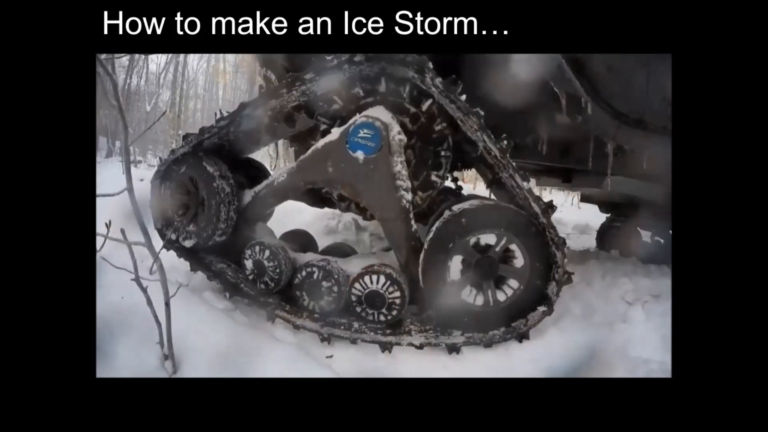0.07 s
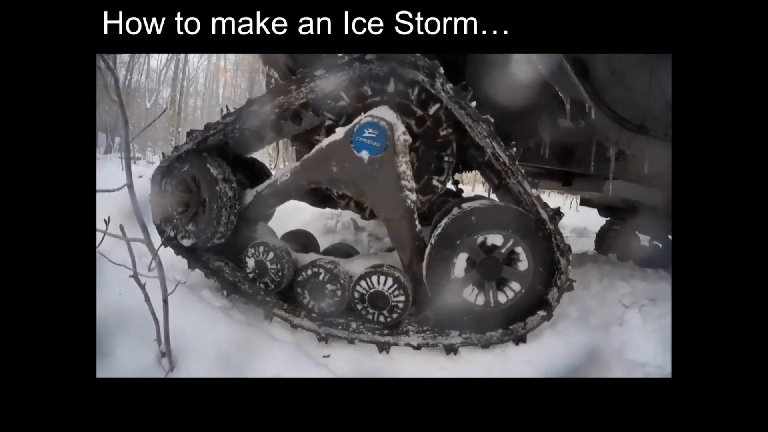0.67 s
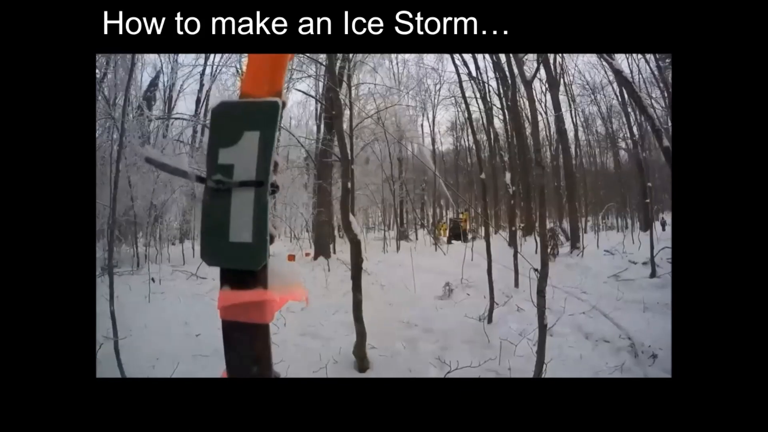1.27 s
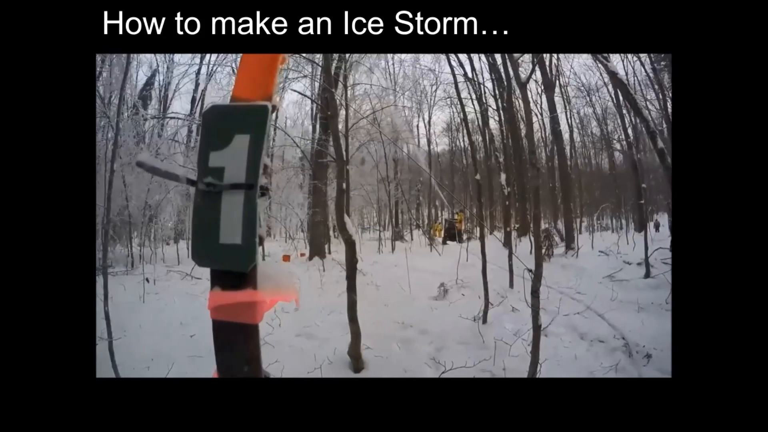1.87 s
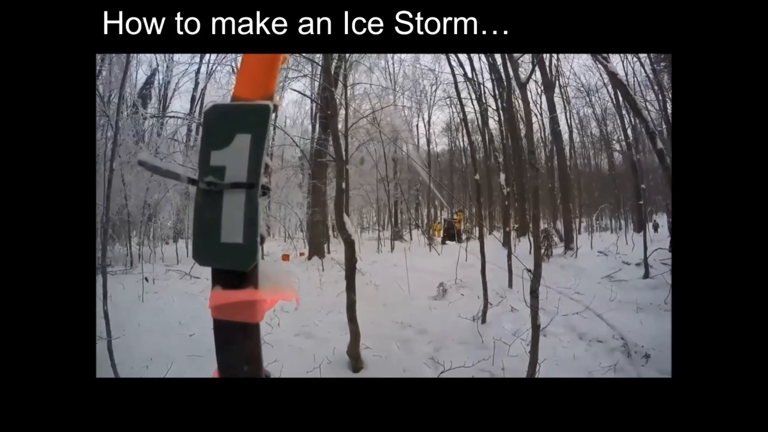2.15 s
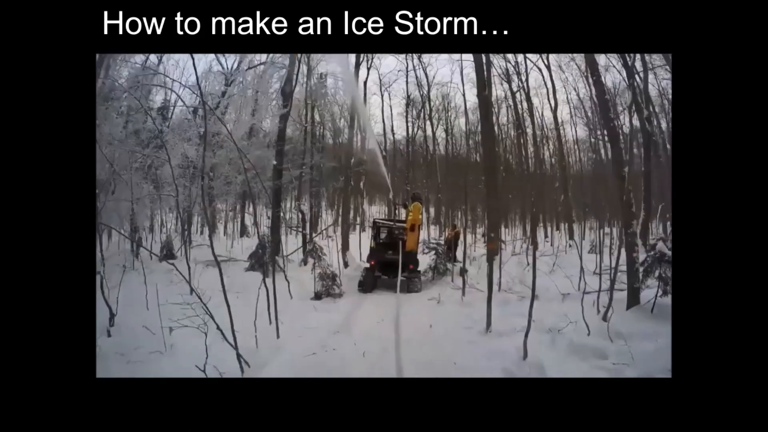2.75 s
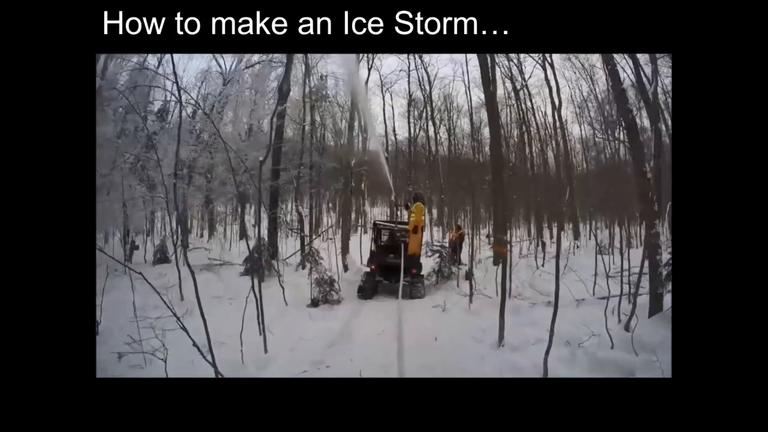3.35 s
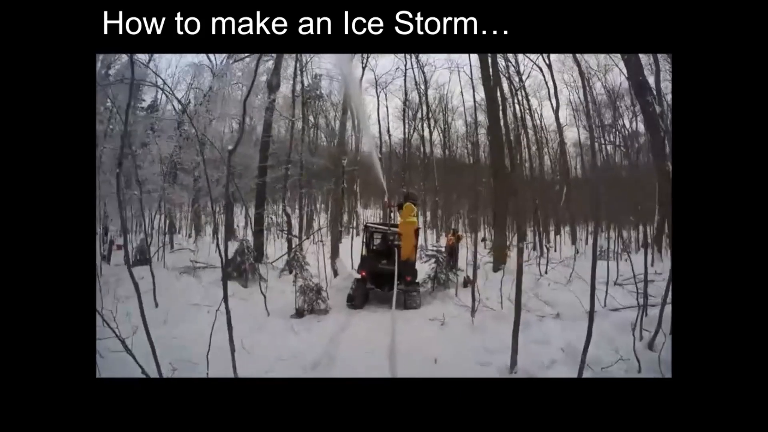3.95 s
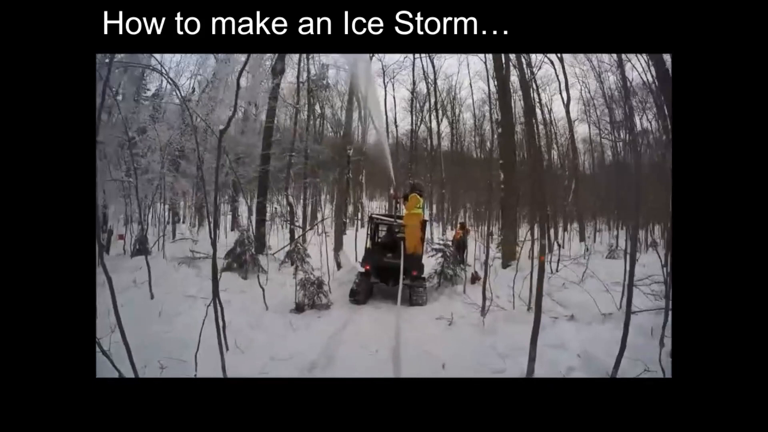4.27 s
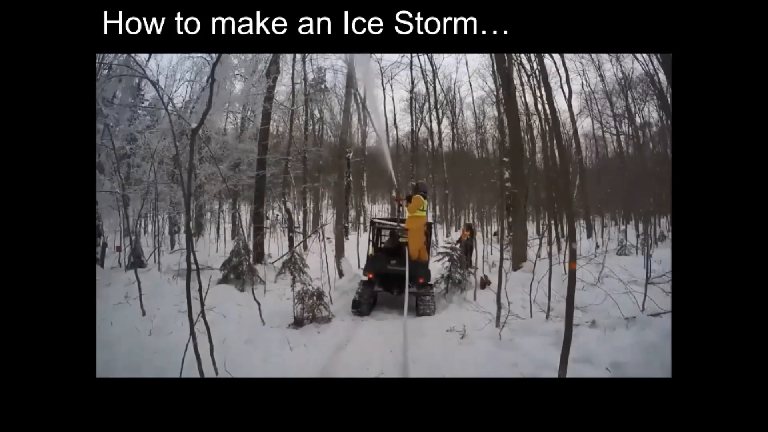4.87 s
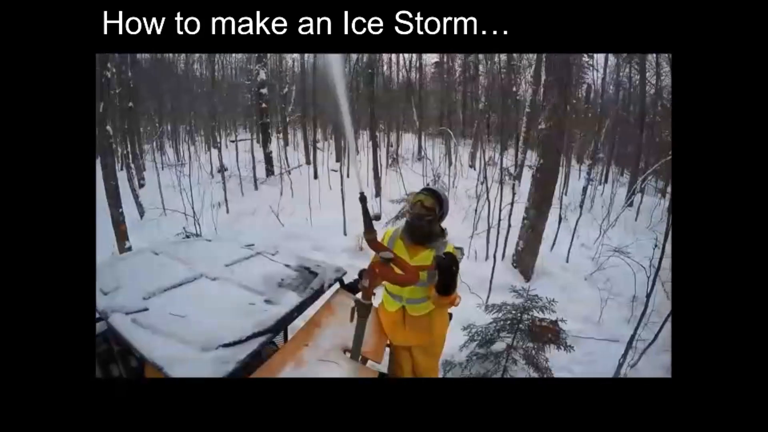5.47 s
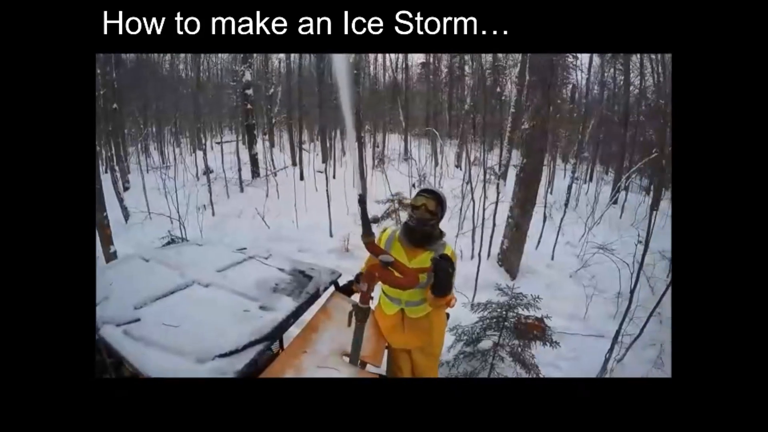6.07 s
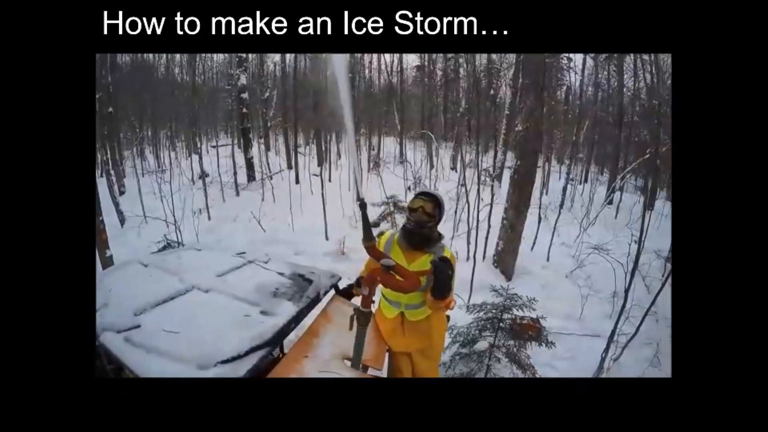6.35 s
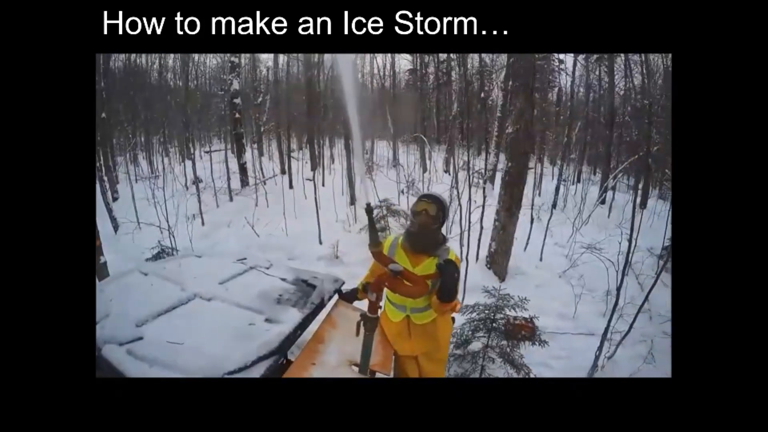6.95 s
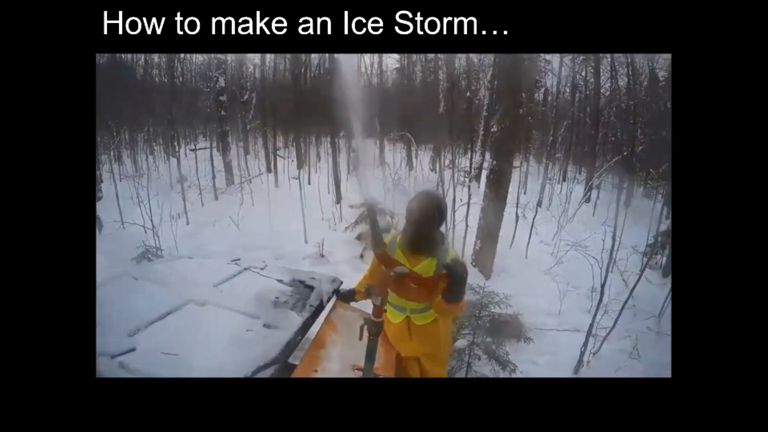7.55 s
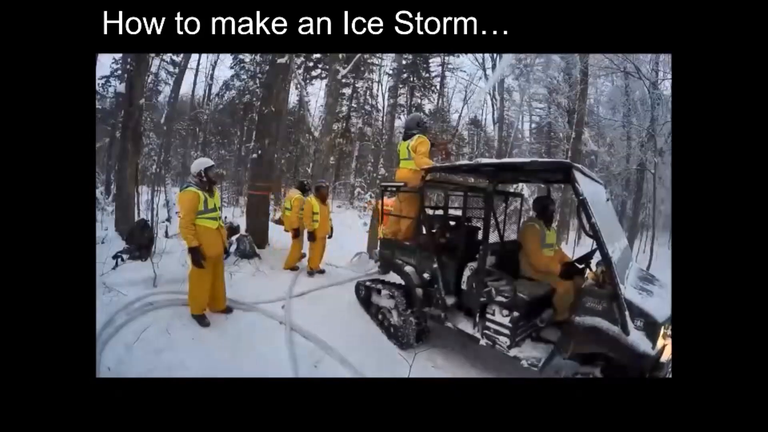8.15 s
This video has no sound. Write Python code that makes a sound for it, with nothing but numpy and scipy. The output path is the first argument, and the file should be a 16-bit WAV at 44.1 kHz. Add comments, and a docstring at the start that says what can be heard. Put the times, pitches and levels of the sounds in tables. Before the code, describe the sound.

Loud rubber track rattle and metal clanks give way to a quieter, steady engine hum and clatter that grows nearer in stages.

```python
"""A tracked utility vehicle in a snowy wood, heard from five places in turn. Close by, its rubber track hammers
the wheel frame and scrapes over snow; the loudest knocks clank. Then its twin-cylinder engine runs steadily:
far off, nearer, on board, beside it. Firings rattle the casing, the exhaust hums, the chassis rumbles, a pump
drones. The engine powers a water spray, which fizzes twice. Soft air buffets come and go. The sound drops out
now and then."""
import sys
import numpy as np
from scipy import signal
from scipy.fft import rfft, irfft, next_fast_len
from scipy.io import wavfile
from scipy.ndimage import uniform_filter1d

SR = 44100
rng = np.random.default_rng(int(sys.argv[2]) if len(sys.argv) > 2 else 0)


def output_pcm(signal):
    """Save a mono or channel-first signal as 16-bit PCM at the path in sys.argv[1].

    Samples are clipped to [-1, 1] before scaling.
    """
    pcm = np.clip(np.atleast_2d(signal).T, -1, 1) * 32767
    wavfile.write(sys.argv[1], SR, np.round(pcm).astype(np.int16))


N = 361972
T = np.arange(N) / SR
FFT_SIZE = next_fast_len(N)
BIN_HZ = np.fft.rfftfreq(FFT_SIZE, 1 / SR)

# Broad spectra. Each row: frequency in Hz, relative density in dB.
FRAME_SPECTRUM = [(25, -31.5), (60, -15), (110, -1), (230, -4.5), (330, 3), (560, -1), (900, 2.5),
                  (1400, -6.5), (2100, -6.5), (2900, -15), (3700, -17.5), (4600, -30), (7000, -32),
                  (12000, -38), (15000, -38.5)]
SCRAPE_SPECTRUM = [(50, -17.5), (120, -4.5), (400, -0.5), (1000, 5), (1500, -6), (2600, -7.5),
                   (4500, -15.5), (7000, -18), (9000, -23.5), (12000, -30.5), (15000, -47)]
CHASSIS_SPECTRUM = [(15, -29), (26, -6), (37, -4), (70, -0.5), (95, -9.5), (150, -12), (220, -17.5),
                    (400, -15.5), (650, -30), (1200, -58)]
FAR_CASING = [(300, -21), (500, -12.5), (750, -15.5), (1300, -7), (1800, -9.5), (2200, -8.5), (2650, 1.5),
              (3450, -2), (4200, -11.5), (5250, -7), (5800, -11.5), (7700, -18), (9000, -28.5),
              (10500, -21), (15000, -32)]
NEAR_CASING = [(290, -32), (500, -12), (714, -13.5), (896, -7.5), (1130, -10), (1240, 0.5), (1560, -9.5),
               (1850, -1), (2170, -6), (2570, 4.5), (3410, 1), (5540, -4), (6800, -9.5), (7300, -15),
               (10800, -22.5), (12500, -19), (14000, -19), (15000, -29)]
ABOARD_CASING = [(290, -35.5), (500, -8), (694, -15), (777, -8), (883, -10.5), (1170, -2.5), (1420, -4),
                 (1720, -12.5), (2330, -5), (2610, 3), (3410, -6), (4290, -6.5), (4870, -1), (8020, -20.5),
                 (11800, -20.5), (15000, -26.5)]
BESIDE_CASING = [(290, -44), (500, -8), (734, -7.5), (1110, -4.5), (1210, -3.5), (1720, -4), (3000, 2),
                 (3460, -6), (3880, 4), (4230, -8), (5230, -2.5), (6670, -8), (7580, -19.5), (12500, -16.5),
                 (15000, -29)]
# Wheel frame resonances. Each row: centre in Hz, width in Hz, height over the broad spectrum in dB.
FRAME_PEAKS = [(305, 30, 3), (390, 30, 5), (465, 40, 6), (630, 25, 3), (762, 35, 7), (1062, 40, 8),
               (1625, 70, 6), (1681, 14, 9), (1822, 45, 12), (1970, 60, 8), (2448, 30, 5), (2615, 45, 8)]
# The pump's low drone. Each row: centre in Hz, width in Hz, height over the rumble in dB.
PUMP_TONES = [(36, 6.5, 6.5), (73, 4.2, 6)]
# Loudest track knocks. Each row: start in seconds, relative level in dB, centre in Hz.
LOUD_KNOCKS = [(0.001, -28, 1280), (0.099, -31.5, 1850), (0.131, -41, 3000), (0.193, -35, 1710),
               (0.257, -42.5, 1850), (0.287, -33.5, 1520), (0.454, -32, 1500), (0.454, -34.5, 3500),
               (0.546, -33.5, 1200), (0.581, -34, 1830), (0.709, -38, 3400), (0.949, -38, 1190),
               (1.036, -41, 1100)]
# Engine speed. Each row: time in seconds, four-stroke cycles per second.
CYCLE_RATE = [(1.2, 26.482), (2.6, 25.849), (3.05, 26.264), (4.2, 26.398), (5.6, 26.042), (6.5, 26.153),
              (7.8, 25.964)]
# Engine fades per place. Each: start, fade-in length, fade-out start, fade-out length, in seconds.
FAR_FADES = (0.79, 0.35, 2.71, 0.62)
NEAR_FADES = (2.61, .45, 5.31, .4)
ABOARD_FADES = (5.162, 0.51, 7.567, 0.47)
BESIDE_FADES = (7.79, 0.025, 8.3, .1)
# Pinging engine parts. Each row: centre in Hz, width in Hz, relative gain in dB.
FAR_PING_MODES = [(1305, 61, 2), (2950, 91, -1), (3560, 70, 9.5), (5220, 120, 5), (6220, 96, -2)]
NEAR_PING_MODES = [(1280, 120, 7), (2900, 160, 8), (3380, 100, 18.5), (3690, 110, 8), (4160, 73, 4),
                   (4670, 200, 17), (5380, 260, 6.9), (7540, 180, 0.33)]
ABOARD_PING_MODES = [(2730, 350, -11), (3900, 29, 3), (4690, 59, 2), (4980, 150, -2)]
BESIDE_PING_MODES = [(3070, 200, -13), (3750, 160, 0), (4520, 200, -5), (5130, 88, -12)]
# Exhaust hum and gear whine. Each row: order as a multiple of the cycle rate, relative level in dB.
FAR_HUM = [(2, 3), (3, -38), (4, -6.5), (5, -33.5), (6, -23), (8, -14.5), (10, -35)]
NEAR_HUM = [(1, -6), (2, 2.5), (3, -33), (4, -.5), (5, -24), (6, -15.5), (8, -13.5), (10, -17), (11, -22),
            (12, -17.5), (14, -26), (16, -18), (18, -21), (19, -25), (20, -22.5)]
ABOARD_HUM = [(1, -12), (2, -3), (3, -11.5), (4, 2.5), (5, -5.5), (6, -6), (7, -6), (8, -22), (9, -13),
              (10, -10.5), (11, -15), (12, -14.5), (13, -9.5), (14, -29), (15, -15.5), (16, -28),
              (17, -15.5), (18, -23), (19, -20), (20, -35), (21, -32), (22, -29), (23, -38), (24, -31),
              (25, -23)]
BESIDE_HUM = [(1, -28), (2, 5), (3, -26.5), (4, -7), (5, -22), (6, -13), (7, -32.5), (8, -0.5), (9, -17),
              (10, -18), (11, -12.5), (12, -13), (13, -16), (14, -17.5)]
ABOARD_WHINE = [(29, -24.5), (44, -19.5)]
BESIDE_WHINE = [(44, -17), (50, -16.5), (147, -32)]
# Brief dropouts. Each entry: start in seconds.
DROPOUT_STARTS_S = [1.776, 1.983, 2.638, 2.788, 3.138, 3.418, 3.698, 3.738, 3.858, 3.998, 4.098, 4.418,
                    4.458, 4.658, 5.698, 5.858, 6.578, 6.978, 7.158, 7.178, 8.138]
# Swells of air and water. Each row: start in seconds, length in seconds, top level in dB.
AIR_BUFFETS = [(2.95, 0.28, -51.5), (3.33, 0.14, -58), (4.38, 0.36, -65), (6.5, 0.22, -53)]
SPRAY_SURGES = [(5.36, .32, -54), (6.1, .2, -51)]


def amp(db):
    """Decibels to gain."""
    return 10 ** (np.asarray(db) / 20)


def unit(x):
    """Scales to rms 1."""
    return x / np.sqrt(np.mean(x ** 2) + 1e-20)


def ramp(start_s, length_s):
    """Linear rise from 0 to 1."""
    return np.clip((T - start_s) / length_s, 0, 1)


def drift(per_s):
    """Random curve, per_s new values a second."""
    return np.interp(T * per_s, np.arange(N // 8), rng.standard_normal(N // 8))


def colour(x, spectrum=((1, 0),), peaks=()):
    """Broad spectrum plus peaks, rms 1; minimum phase, so ringing follows each blow."""
    hz, db = np.transpose(spectrum)
    db = np.interp(np.log(BIN_HZ + 1), np.log(hz), db)
    for centre_hz, width_hz, height_db in peaks:
        db = db + height_db / (1 + (2 * (BIN_HZ - centre_hz) / width_hz) ** 2)
    cepstrum = irfft(np.log(amp(db)), FFT_SIZE)
    cepstrum[1:] *= 2 * (np.arange(1, FFT_SIZE) < FFT_SIZE / 2)
    response = np.exp(rfft(cepstrum))
    return unit(irfft(rfft(x, FFT_SIZE) * response, FFT_SIZE)[:N])


def blows(cycles, rise_cycles, decay_cycles, scatter_db):
    """Envelope of one blow a cycle, each of random strength."""
    age = cycles % 1
    strength = amp(scatter_db * rng.standard_normal(512))[cycles.astype(int) % 512]
    return strength * (1 - np.exp(-(age / rise_cycles) ** 2)) * np.exp(-age / decay_cycles)


def grit(grain_db):
    """Noise of tiny, uneven impacts."""
    return rng.standard_normal(N) * amp(grain_db * drift(1500))


def track(slow_hz=31.2, fast_hz=33.6, speed_up_s=0.76):
    """Rubber track knocks ring the wheel frame, over snow scrape and a thud at twice the knock rate."""
    cycles = np.cumsum(np.where(T < speed_up_s, slow_hz, fast_hz)) / SR
    force = 0.08 + blows(cycles - 0.04, 0.07, 0.29, scatter_db=0.6)
    knocks = amp(-5) * colour(force * grit(-0.5), FRAME_SPECTRUM, FRAME_PEAKS)
    scrape = amp(-8) * colour(grit(1.5), SCRAPE_SPECTRUM, FRAME_PEAKS)
    thud = amp(-27) * unit(np.cos(4 * np.pi * cycles))
    gain = amp(-29.5) * (1 - ramp(start_s=0.65, length_s=0.6))
    return gain * (knocks + scrape + thud)


def clanks(rise_s=0.0044, decay_s=0.013):
    """The loudest track knocks strike the frame: band-limited bursts ring its resonances."""
    strikes, t = np.zeros(N), T[:4096]
    octave = np.log2(np.fft.rfftfreq(len(t), 1 / SR) + 1)
    envelope = 2 * (1 - np.exp(-t / rise_s)) * np.exp(-t / decay_s)
    for start_s, db, hz in LOUD_KNOCKS:
        width_octaves = 0.62 * (1500 / hz) ** 1.26
        band = np.exp(-((octave - np.log2(hz)) / width_octaves) ** 2 / 2)
        burst = unit(irfft(rfft(rng.standard_normal(len(t))) * band))
        strikes[round(start_s * SR):][:len(t)] += amp(db) * burst * envelope
    return np.std(strikes) * colour(strikes, peaks=FRAME_PEAKS)


def fader(fades, db, db_per_s):
    """Gain at one place: fade in, sloping hold, fade out."""
    start_s, fade_in_s, leave_s, fade_out_s = fades
    hold = amp(db + db_per_s * (T - (start_s + leave_s) / 2))
    return ramp(start_s, fade_in_s) * (1 - ramp(leave_s, fade_out_s)) * hold


def engine_tones(cycles, orders, waver_rad, upper_db=0):
    """Wavering engine orders; phase offsets above order 4 spread each pulse over the cycle."""
    tones = np.zeros(N)
    for order, db in orders:
        k = round(order)
        phase = 1.1 * max(k - 4, 0) ** 2 + waver_rad * np.sqrt(k) * drift(9)
        gain = amp(db + (k > 8) * upper_db)
        tones += gain * np.sqrt(2) * np.cos(2 * np.pi * k * cycles + phase)
    return tones


def pings(cycles, modes):
    """The nearer cylinder's firing rings metal parts in narrow resonances."""
    taps = blows(cycles, 0.04, 0.09, scatter_db=1.5) * rng.standard_normal(N)
    return unit(sum(amp(db) * signal.lfilter(*signal.iirpeak(hz, hz / width_hz, fs=SR), taps)
                    for hz, width_hz, db in modes))


def casing(cycles, spectrum, ping_modes, ping_db, farther_gain, steady_gain, gears=()):
    """Two firings and four valve ticks a cycle shake the casing; parts ping, any gears whine."""
    nearer = blows(cycles, 0.05, 0.12, scatter_db=3)
    farther = farther_gain * blows(cycles + 0.5, 0.05, 0.12, scatter_db=3)
    valves = 0.23 * blows(4 * cycles, 0.07, 0.05, scatter_db=1.7)
    clatter = colour((steady_gain + nearer + farther + valves) * grit(1), spectrum)
    ringing = amp(ping_db) * pings(cycles, ping_modes)
    whine = engine_tones(cycles, gears, waver_rad=0.083)
    return clatter + ringing + whine


def exhaust(cycles, orders, lag_cycles, rumble_db, upper_db=0):
    """The pipe hums on the engine orders; the pump drones within the chassis rumble."""
    hum = unit(engine_tones(cycles - lag_cycles, orders, waver_rad=0.34, upper_db=upper_db))
    rumble = colour(rng.standard_normal(N), CHASSIS_SPECTRUM, PUMP_TONES)
    return hum + amp(rumble_db) * rumble


def engine():
    """Twin-cylinder four-stroke: casing and exhaust from four places in turn."""
    cycles = np.cumsum(np.interp(T, *np.transpose(CYCLE_RATE))) / SR
    # The beat shifts at the long dropout and at each new place.
    far = cycles - np.where(T < 1.797, 0.725, 0.975)
    near, aboard, beside = cycles - 0.79, cycles - 0.68, cycles - 0.18
    # At the nearer place the vehicle creeps closer: upper exhaust orders grow.
    start_s, _, leave_s, _ = NEAR_FADES
    creep_db = -3.5 + 2.5 * np.clip(T - start_s, 0, leave_s - start_s)
    return sum([
        fader(FAR_FADES, db=-56, db_per_s=-0.7)
        * casing(far, FAR_CASING, FAR_PING_MODES, ping_db=-9.5, farther_gain=1, steady_gain=0.59),
        fader(FAR_FADES, db=-61, db_per_s=2)
        * exhaust(far, FAR_HUM, lag_cycles=0.032, rumble_db=-6),
        fader(NEAR_FADES, db=-50, db_per_s=1.27)
        * casing(near, NEAR_CASING, NEAR_PING_MODES, ping_db=-11, farther_gain=0.24, steady_gain=0.74),
        fader(NEAR_FADES, db=-51, db_per_s=0.1)
        * exhaust(near, NEAR_HUM, lag_cycles=0.031, rumble_db=-10, upper_db=creep_db),
        fader(ABOARD_FADES, db=-40.5, db_per_s=-0.62)
        * casing(aboard, ABOARD_CASING, ABOARD_PING_MODES, ping_db=-8,
                 farther_gain=0.57, steady_gain=1, gears=ABOARD_WHINE),
        fader(ABOARD_FADES, db=-42, db_per_s=-0.05)
        * exhaust(aboard, ABOARD_HUM, lag_cycles=-0.038, rumble_db=-9),
        fader(BESIDE_FADES, db=-44, db_per_s=0.5)
        * casing(beside, BESIDE_CASING, BESIDE_PING_MODES, ping_db=-8.5,
                 farther_gain=0.72, steady_gain=0.95, gears=BESIDE_WHINE),
        fader(BESIDE_FADES, db=-43, db_per_s=2)
        * exhaust(beside, BESIDE_HUM, lag_cycles=-0.076, rumble_db=-8)])


def swells(rows):
    """One half-sine of gain per event."""
    return sum(amp(db) * np.sin(np.pi * ramp(start_s, length_s)) for start_s, length_s, db in rows)


def wind():
    """Air nudges the microphone in soft, low buffets."""
    spectrum_hz_db = [(10, 0), (25, -3), (70, -3), (160, -33), (500, -34), (2000, -79)]
    return swells(AIR_BUFFETS) * colour(rng.standard_normal(N), spectrum_hz_db)


def spray():
    """The water jet fizzes in the top octave."""
    spectrum_hz_db = [(3000, -31.5), (7000, 0), (10000, -5), (12000, 5), (13500, -3), (15500, -11)]
    return swells(SPRAY_SURGES) * colour(grit(7.2), spectrum_hz_db)


def scene():
    """Mono mix: the track fades into the engine; wind and spray join."""
    return (track() + clanks() + engine() + wind() + spray())[None]


def record(dry):
    """Brief dropouts and one long one, then a low-pass."""
    brief_s, long_start_s, long_s, cutoff_hz = 0.009, 1.797, 0.175, 15500
    gain = np.ones(N)
    for start_s in DROPOUT_STARTS_S:
        gain[(T >= start_s) & (T < start_s + brief_s)] = amp(-23)
    gain[(T >= long_start_s) & (T < long_start_s + long_s)] = amp(-48)
    gated = dry * uniform_filter1d(gain, size=16)
    lowpass = signal.firwin(511, cutoff_hz, window=("kaiser", 9), fs=SR)
    return signal.oaconvolve(gated, lowpass[None], "same")


dry = scene()
out = record(dry)
output_pcm(out)
```